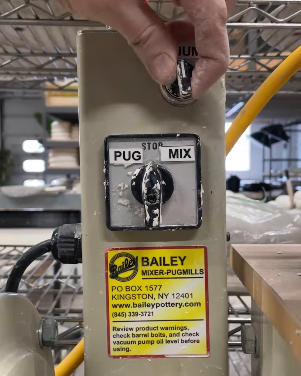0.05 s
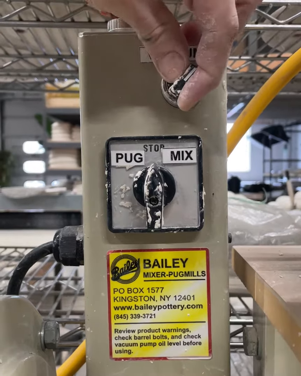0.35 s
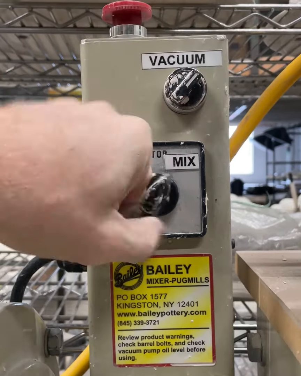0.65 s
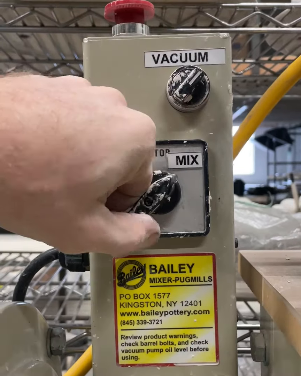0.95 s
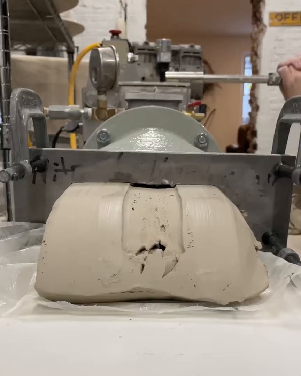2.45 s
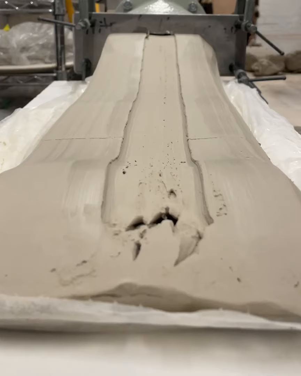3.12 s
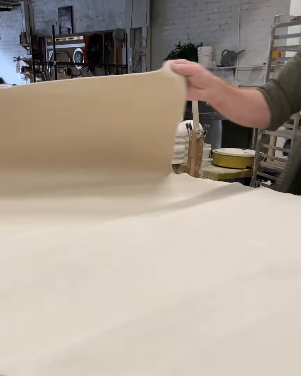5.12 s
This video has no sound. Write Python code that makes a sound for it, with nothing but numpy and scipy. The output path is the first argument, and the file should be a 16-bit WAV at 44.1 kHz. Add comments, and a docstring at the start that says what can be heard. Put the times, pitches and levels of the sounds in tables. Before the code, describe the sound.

A switch clicks and a clay mixer's motor and pump knock rapidly, then stop; wet clay crackles and is scraped and slid.

```python
"""A pugmill in a pottery studio, heard close up from one place after another.
First a switch starts the motor and vacuum pump, whose valve knocks the housing 29 times a second.
At 1.3 s a second switch bangs and a limiter ducks the level. At 3.8 s the pump stops, and wet clay
crackles out of the nozzle as air pockets burst. The clay is then scraped, stroked and slid, sounding
by stick-slip friction, and at last drops onto the table. The room rumbles throughout.
"""
import sys
import numpy as np
from scipy import signal
from scipy.fft import rfft, irfft
from scipy.io import wavfile
from scipy.ndimage import uniform_filter1d, minimum_filter1d

SR = 44100
rng = np.random.default_rng(int(sys.argv[2]) if len(sys.argv) > 2 else 0)


def transcribe(u):
    """Save the signal u as a 16-bit wav file named by the first command-line argument.

    u: samples, shape (n,) or (channels, n), limited to [-1, 1]; the rate is SR.
    q: integer samples, one column per channel.
    """
    v = np.clip(np.atleast_2d(u).T, -1, 1)
    q = np.round(v * 32767).astype(np.int16)
    wavfile.write(sys.argv[1], SR, q)


N = 299020
T = np.arange(N) / SR
PUMP_STOP_S = 3.82

# the housing's response to a knock at each listening place: (frequency [Hz], level [dB])
AT_PANEL = [(120, -4.5), (204, -9), (234, -16), (263, 2.5), (292, -10), (321, -1), (395, 9.5), (455, -7.5),
            (550, -2), (740, -8), (1080, -18.5), (1200, -11.5), (1340, -12.5), (1470, -26), (2000, -26),
            (3000, -34), (5000, -66)]
AT_SWITCH = [(120, -11.5), (204, -8.5), (292, -21.5), (321, -2.5), (350, -11), (380, 2.5), (438, 6),
             (467, -8), (496, 2.5), (560, -22.5), (670, -16), (900, -26.5), (1170, -22), (1650, -27.5),
             (2200, -38), (2900, -31.5), (4500, -70.5)]
AT_PUMP = [(145, -10.5), (204, -14.5), (263, 0.5), (292, -23), (321, 1.5), (350, -12), (435, 4.5),
           (475, -7), (600, -13.5), (800, -19), (920, -23.5), (1050, -23), (1230, -26.5), (1450, -38),
           (5000, -53.5)]
# level difference between the ears: (frequency [Hz], left minus right [dB])
PANEL_LEAN = [(130, 6.5), (380, 5), (650, 7.5), (1290, 2), (2400, -6), (4400, 11)]
PUMP_LEAN = [(350, 2), (700, -7.5), (1290, -8), (4400, -8.5)]
CENTRED = [(100, 0.0026)]
# the knock's quick slap off a nearby surface, at the panel and by the pump: (delay [s], gain [ratio])
PANEL_SLAP, PUMP_SLAP = (0.002447, 0.67), (0.002234, -0.62)
# the listening places in turn: (housing response, lean, right-ear lag frequency [Hz], slap)
PLACES = ([(AT_PANEL, PANEL_LEAN, 740, PANEL_SLAP)] * 2
          + [(AT_SWITCH, CENTRED, 4900, PUMP_SLAP), (AT_SWITCH, PUMP_LEAN, 5000, PUMP_SLAP)]
          + [(AT_PUMP, CENTRED, 9000, PUMP_SLAP)] * 2)
# the pump at each place: (start [s], first knock [s], shaft speed [turns/s])
PUMP_RUNS = [(.26, .305, 29.0), (.487, .5157, 29.04), (1.155, 1.183, 29.33), (1.82, 1.8396, 29.22),
             (2.485, 2.508, 29.29), (3.155, 3.178, 29.27)]
# its strength there: (knock [dB], 4th order [dB], 6th order [dB], mains [dB], hiss [dB], echo [dB])
PUMP_LEVELS = [(-17.5, -21, -27, -44, -33.5, -0.5), (-18, -22.5, -29, -35, -34, -2),
               (-24.5, -27, -26, -25.5, -40.5, 0.5), (-19, -30, -26, -49, -39, -2.5),
               (-30, -31.5, -33.5, -66, -51.5, 6.5), (-31.5, -31.5, -30.5, -50, -49.5, 6)]
# air from the pump: (frequency [Hz], level [dB])
AIR_TONE = [(1760, -3.5), (3000, -7), (7400, -7.5), (13000, -5), (16000, -11)]
# the motor's whine: (frequency [Hz], level [dB])
MOTOR_WHINE = [(2137, -61), (2880, -58.5)]
# its tones at start-up, by the nozzle and under load: (start [s], end [s], frequency [Hz], level [dB])
MOTOR_HUMS = [(0.14, 0.27, 110.5, -24), (3.157, 3.818, 797, -44), (3.16, 3.825, 1024, -51),
              (5.646, 6.156, 118.3, -36.5)]

# switch clicks, and a faint tick where the listening place changes: (time [s], peak [dB], t60 [s])
CLICKS = [(0.1443, -9, 0.034), (0.487, -12.5, 0.0077), (0.664, -6, 0.034), (0.713, -17.5, 0.15),
          (1.328, -8.5, 0.017), (1.335, 5.5, 0.081), (3.1548, -24.5, 0.0061), (5.808, -13, 0.047)]
# bursts of air pockets in the clay: (time [s])
POP_TIMES = [3.823, 3.8337, 3.8525, 3.8615, 3.8763, 3.9029, 3.954, 3.991, 4.036, 4.048, 4.0687, 4.1176,
             4.199, 4.2286, 4.247, 4.266, 4.279]
# sticky clay letting go: (time [s], peak [dB])
CLAY_SNAPS = [(4.501, -11.5), (4.521, -16), (4.618, -21), (4.669, -23), (4.731, -21), (4.77, -21.5),
              (4.791, -21), (4.889, -14.5)]
# pushes on the clay, by kind: (start [s], peak time [s], peak level [dB])
SQUEEZES = [(3.82, 3.83, -45.5), (4.255, 4.3, -32.5)]
SCRAPES = [(4.488, 4.485, -30.5), (4.604, 4.806, -37), (4.867, 5.137, -28)]
STROKES = [(5.513, 5.613, -44.5), (5.652, 5.752, -46.5), (5.79, 6.088, -43)]
SLIDES = [(5.157, 5.25, -54), (6.152, 6.168, -41)]
# spectra of a click, a pop, each kind of push and the slab's bumping: (frequency [Hz], level [dB])
CLICK_TONE = [(350, -52.5), (600, 3), (1700, 2), (8160, -3), (13400, -7), (16000, -26)]
POP_TONE = [(410, -53), (900, -9), (4000, -10), (6000, -9), (12600, -10.5), (16000, -31)]
SQUEEZE_TONE = [(500, -37), (1200, -12), (7830, -6.5), (13000, -12.5), (16000, -22)]
SCRAPE_TONE = [(240, -33), (400, -5), (2470, 1), (12900, -5), (16000, -16)]
STROKE_TONE = [(400, -24), (2500, -9.5), (13000, -13.5)]
SLIDE_TONE = [(240, -14), (400, -3.5), (1700, -3), (5030, -19), (13000, -17)]
BUMP_TONE = [(25, -15), (60, 7.5), (150, -18.5), (260, -4.5), (600, -62)]
# resonances of an air pocket and of the nozzle: (frequency [Hz], bandwidth [Hz], gain [ratio])
POCKET_RINGS = [(1460, 120, 1.1), (5480, 180, 2.6)]
NOZZLE_RINGS = [(1320, 190, 2.4), (2080, 77, 7.7), (3960, 240, 2), (5540, 260, 0.67)]
# modes of knob, panel, control box, table and smacking clay: (frequency [Hz], bandwidth [Hz], level [dB])
KNOB_MODES = [(1950, 73, 2), (3870, 26, -7)]
PANEL_MODES = [(1330, 110, 0)]
BOX_MODES = [(315, 81, 0.076), (580, 150, -1.1)]
TABLE_MODES = [(616, 100, 0), (334, 100, -4)]
SMACK_MODES = [(1160, 320, 0)]
# short rubs that excite them; the control box's second row is the pump's weak first knock: (time [s], half-
# width [s], level [dB])
KNOB_RUBS = [(0.737, 0.024, -35.5)]
PANEL_RUBS = [(0.19, 0.11, -45)]
BOX_RUBS = [(.16, 0.011, -31), (.236, 0.012, -30)]
TABLE_RUBS = [(5.605, 0.024, -39.5), (5.655, 0.0039, -38.5)]

# the studio's rumble: (frequency [Hz], level [dB])
ROOM_TONE = [(25, -39.5), (55, -8), (110, 2), (240, -8.5), (700, -22.5), (1700, -34), (5400, -40.5),
             (16000, -76)]
# its strength by the panel, the pump, the nozzle and the table: (start [s], level [dB])
ROOM_LEVELS = [(0, -36), (2.485, -35), (3.82, -37), (5.157, -39)]
# stereo width of noise: (frequency [Hz], side minus mid [dB])
STEREO_WIDTH = [(60, -40.5), (400, -4), (2500, -4.5), (6000, -1.5), (14000, 4)]
# treble colour, the centre hollow near 10 kHz and the sides dull above 12 kHz: (frequency [Hz], gain [dB])
MID_TONE = [(4400, 0.5), (4900, -5), (5300, 2.5), (8200, -1), (9400, -20), (11100, -23), (11900, -0.5)]
SIDE_TONE = [(11500, -1.5), (14500, -8)]


def pump(run, end, levels, place, tick_db=-3, tick_turn=0.54, tick_hz=2000, puff=2.8):
    """Periodic impact: each turn the exhaust valve knocks, air puffs out and the inlet valve ticks."""
    start, first, rate = run
    knock_db, fourth_db, sixth_db, mains_db, hiss_db, echo_db = levels
    housing, lean, lag_hz, (slap_s, slap_gain) = place
    run_up = .25 * np.exp(-(T - PUMP_RUNS[0][0]) / .018)  # the first turn is slow
    turns = (T - first) * rate + run_up + .0035 * drift(size=4000)
    # the slap off a nearby surface has no bass, and the light inlet valve only treble
    slap = slap_gain * high_pass(strikes(turns - slap_s * rate), 670)
    tick = amp(tick_db) * high_pass(strikes(turns - tick_turn), tick_hz)
    blow = colour(high_pass(strikes(turns), 74) + slap + tick, housing)
    blow = disperse(blow, hz=420, q=1.5)
    ears = np.array([blow, disperse(blow, lag_hz, q=1)])
    ears += amp(echo_db) * echo(blow, t60=.08, low_hz=760)
    knock = np.array([colour(ear, [(hz, sign * db / 2) for hz, db in lean])
                      for ear, sign in zip(ears, (1, -1))])
    # the shaft's fourth order beats slowly against the mains hum
    hum = amp(fourth_db) * np.cos(2 * np.pi * 4 * turns + np.pi / 2)
    hum -= amp(sixth_db) * np.cos(2 * np.pi * 6 * turns)
    hum += amp(mains_db) * np.cos(2 * np.pi * 120 * T)
    # echo smooths the puffs into a steady hiss and blurs the knock into a churn
    airflow = 1 + puff / (1 + amp(2 * echo_db)) * np.exp(-((turns % 1 - .16) / 0.078) ** 2)
    air = amp(hiss_db) * unit_rms(noise(airflow, AIR_TONE))
    churn = amp(knock_db + echo_db - 13) * unit_rms(high_pass(noise(airflow, housing), 560, order=6))
    return between(start, end) * (amp(knock_db) * unit_rms(knock) + np.sqrt(2) * hum + air + churn)


def motor():
    """Phase modulation makes the motor's hum and whine waver; air hisses as the pump runs up."""
    hum = sum(between(start, end) * amp(db) * unit_rms(np.sin(2 * np.pi * hz * T + 0.43 * drift(2500)))
              for start, end, hz, db in MOTOR_HUMS)
    whine = sum(amp(db) * unit_rms(np.sin(2 * np.pi * hz * T + 2 * drift(200))) for hz, db in MOTOR_WHINE)
    air = between(0.14, .26) * amp(-42) * unit_rms(noise(np.ones(N), AIR_TONE))
    return hum + between(PUMP_RUNS[0][0], PUMP_STOP_S) * whine + air


def switches(thump_s=1.339, thump_db=22, thump_hz=55, thump_t60=0.069, jolt_cycles=1.3, jolt_s=0.0035):
    """Impact excitation: switches click, and a contactor thumps the control box, sharply and then deep."""
    clicks = sum(burst(s, db, t60, CLICK_TONE) for s, db, t60 in CLICKS)
    t = np.maximum(T - thump_s, 0)
    onset = 1 - np.exp(-t / jolt_s)
    cycles = thump_hz * t + jolt_cycles * onset
    thump = amp(thump_db - 60 * t / thump_t60) * onset * np.sin(2 * np.pi * cycles)
    box = sum(judder(*row, BOX_MODES) for row in BOX_RUBS)
    panel = sum(judder(*row, PANEL_MODES) for row in PANEL_RUBS)
    reflections = amp(-14.5) * echo(clicks[0], t60=0.53, low_hz=300)
    knob = sum(judder(*row, KNOB_MODES) for row in KNOB_RUBS)
    return clicks + thump + box + panel + reflections + knob


def air_pockets(first_db=-17.5, fade_db_per_s=6):
    """Cavity resonance: bursting pockets ring, the larger ones lower, and weaken as the air runs out."""
    sizes = 1 + .022 * rng.standard_normal(len(POP_TIMES))
    pops = [burst(s, first_db - fade_db_per_s * (s - POP_TIMES[0]), 0.018, POP_TONE, rise_s=0.0039)
            for s in POP_TIMES]
    return sum(resonate(pop, [(hz / size, width, gain) for hz, width, gain in POCKET_RINGS])
               for pop, size in zip(pops, sizes))


def sputter(slips_per_s=80, jitter=.22, uneven_db=2.5, smooth=0.22):
    """Stick-slip flow: clay under pressure moves in quick, uneven puffs that ring the nozzle."""
    slips = np.cumsum(slips_per_s * np.exp(jitter * drift(size=500))) / SR
    sizes = amp(uneven_db * rng.standard_normal(N))[slips.astype(int)]
    puffs = sizes * np.sin(np.pi * slips) ** 6
    return unit_rms(resonate(noise(puffs + smooth, SQUEEZE_TONE), NOZZLE_RINGS))


def rub(tone, grains_per_s, grain_s, smooth):
    """Friction noise: clay sticks and tears in tiny grains of uneven size over a smooth hiss."""
    sizes = amp(3.2 * np.minimum(rng.exponential(1, N), 4))
    tears = rng.random(N) < grains_per_s / SR
    grains = unit_rms(signal.lfilter([1], [1, -np.exp(-1 / (grain_s * SR))], sizes * tears))
    return unit_rms(noise(grains + smooth, tone))


def flop(s, hz, db, t60):
    """Damped free vibration: the slab drops and the table rings low."""
    t = np.maximum(T - s, 0)
    return amp(db - 60 * t / t60) * np.sin(2 * np.pi * hz * t)


def clay():
    """Friction and adhesion: clay is squeezed out, snaps free, and is scraped, stroked and slid."""
    direct = air_pockets()
    direct += sum(burst(s, db, t60=0.017, tone=SCRAPE_TONE) for s, db in CLAY_SNAPS)
    direct += judder(s=4.9005, half_width_s=0.002, db=-25.5, modes=SMACK_MODES)  # wet clay pulls free
    squeeze = force(SQUEEZES, SCRAPES[0][0], swell_db=0, ease_db_per_s=8)
    scrape = force(SCRAPES, SLIDES[0][0], swell_db=8.5, ease_db_per_s=42)
    stroke = force(STROKES, SLIDES[1][0], swell_db=12, ease_db_per_s=10)
    slide = force(SLIDES, N / SR, swell_db=4, ease_db_per_s=10.5)
    direct += squeeze * sputter()
    direct += scrape * rub(SCRAPE_TONE, grains_per_s=800, grain_s=0.00082, smooth=1.36)
    direct += stroke * rub(STROKE_TONE, grains_per_s=400, grain_s=0.00067, smooth=4.0)
    direct += slide * rub(SLIDE_TONE, grains_per_s=830, grain_s=0.00055, smooth=3.4)
    bumps = slide * amp(4.5) * unit_rms(noise(np.ones(N), BUMP_TONE))  # the heavy slab bumps as it slides
    reflections = amp(-21) * echo(direct[0], t60=0.075, low_hz=400)
    table = sum(judder(*row, TABLE_MODES) for row in TABLE_RUBS)
    return direct + reflections + bumps + table + flop(s=6.588, hz=52, db=-28, t60=0.4)


def judder(s, half_width_s, db, modes):
    """Modal excitation: a short rub makes a few damped modes ring."""
    t = T[:SR // 10]
    ring = sum(amp(level) * np.exp(-np.pi * width * t) * np.sin(2 * np.pi * hz * t)
               for hz, width, level in modes)
    friction = np.exp(-((T - s) / half_width_s) ** 2) * rng.standard_normal((2, N))
    friction = friction + friction[::-1] / 2  # the ears share part of it
    return amp(db) * signal.oaconvolve(friction, ring[None] / np.linalg.norm(ring), axes=1)[:, :N]


def burst(s, peak_db, t60, tone, rise_s=0.00089):
    """Exponential decay: a crack of coloured noise swells quickly and dies away."""
    t = T[:SR // 6]
    crack = noise((1 - np.exp(-t / rise_s)) * amp(-60 * t / t60), tone)
    crack *= amp(peak_db) / abs(crack).max()
    return np.pad(crack, ((0, 0), (round(s * SR), N)))[:, :N]


def echo(x, t60, low_hz):
    """Diffuse reflection from the machine and the walls, different at each ear."""
    t = T[:SR // 3]
    tail = rng.standard_normal((2, len(t))) * amp(-60 * t / t60)
    for _ in range(2):  # a flattened spectrum lets no single pitch stand out
        flat = irfft(np.exp(1j * np.angle(rfft(tail))), len(t))
        tail = flat * np.exp(-t / t60) * (t > .002)
    tail = high_pass(tail, low_hz, order=4)
    return signal.oaconvolve(x[None], tail / np.linalg.norm(tail[0]), axes=1)[:, :N]


def room():
    """Ambient noise: the low, uneven rumble of the studio."""
    starts, db = np.transpose(ROOM_LEVELS)
    level_db = uniform_filter1d(db[np.searchsorted(starts[1:], T)], size=2000)
    return amp(level_db + 0.5 * drift(size=3000)) * unit_rms(noise(np.ones(N), ROOM_TONE))


def strikes(turns):
    """Impulse train: one click each time turns passes a whole number, placed between samples."""
    at = np.flatnonzero(np.diff(np.floor(turns)) > 0)
    late = (np.ceil(turns[at]) - turns[at]) / (turns[at + 1] - turns[at])
    size = 1 + 0.012 * rng.standard_normal(len(at))
    out = np.zeros(N)
    out[at], out[at + 1] = size * (1 - late), size * late
    return out


def force(pushes, end, swell_db, ease_db_per_s):
    """Amplitude envelope: each push builds to its peak, then eases off until the next one."""
    out = np.zeros(N)
    stops = [row[0] for row in pushes[1:]] + [end]
    for (start, peak, db), stop in zip(pushes, stops):
        to_go = np.clip((peak - T) / max(peak - start, 1e-3), 0, 1)
        level_db = db - swell_db * to_go - ease_db_per_s * np.maximum(T - peak, 0)
        out += between(start, stop) * amp(level_db)
    return out


def resonate(x, modes):
    """Resonance: adds the ring of a few narrow bands."""
    return x + sum(gain * signal.lfilter(*signal.iirpeak(hz, hz / width, fs=SR), x)
                   for hz, width, gain in modes)


def disperse(x, hz, q):
    """Dispersion: sheet metal holds back the waves near hz, so a knock builds up over a few cycles."""
    return x - 2 * signal.lfilter(*signal.iirpeak(hz, q, fs=SR), x)


def noise(envelope, tone):
    """Partial coherence: coloured noise for two ears, bass in the middle and treble wide."""
    mid, side = (colour(envelope * rng.standard_normal(len(envelope)), tone) for _ in range(2))
    side = colour(side, STEREO_WIDTH)
    return np.array([mid + side, mid - side])


def colour(x, tone, size=4096):
    """Minimum-phase filtering: the given spectrum rings after a blow, never before."""
    level_db = spectrum_db(tone, abs(np.fft.fftfreq(size, 1 / SR)))
    log_gain = np.log(amp(np.maximum(level_db, -100)))
    taps = np.fft.ifft(np.exp(np.conj(signal.hilbert(log_gain)))).real
    return signal.oaconvolve(x, taps)[:len(x)]


def high_pass(x, hz, order=2):
    """High-pass filtering: attenuates the bass below hz."""
    return signal.sosfilt(signal.butter(order, hz, "high", fs=SR, output="sos"), x)


def spectrum_db(tone, hz):
    """Interpolation of a spectrum table on a log-frequency axis."""
    table_hz, db = np.transpose(tone)
    return np.interp(np.log(hz + 1), np.log(table_hz + 1), db)


def between(start, end):
    """Time window: 1 from start to end, with short ramps."""
    return uniform_filter1d(((T >= start) & (T < end)) * 1., size=90)


def drift(size):
    """Random fluctuation, correlated over about size samples."""
    return unit_rms(uniform_filter1d(uniform_filter1d(rng.standard_normal(N), size), size))


def unit_rms(x):
    """Normalisation to an rms of 1."""
    return x / np.sqrt(np.mean(x ** 2) + 1e-20)


def amp(db):
    """Amplitude ratio of a level in decibels."""
    return 10 ** (np.asarray(db) / 20)


def scene():
    """Superposition of the machine, its switches, the clay and the room."""
    ends = [run[0] for run in PUMP_RUNS[1:]] + [PUMP_STOP_S]
    pumping = sum(pump(*row) for row in zip(PUMP_RUNS, ends, PUMP_LEVELS, PLACES))
    return pumping + motor() + switches() + clay() + room()


def record(dry, ceiling_db=-2.0, hold_s=0.09, recovery_db_per_s=95, edge_hz=16200):
    """Mid-side filtering colours the treble of centre and sides; then peaks and bandwidth are limited."""
    hz = np.fft.rfftfreq(N, 1 / SR)
    mid = irfft(rfft((dry[0] + dry[1]) / 2) * amp(spectrum_db(MID_TONE, hz)), N)
    side = irfft(rfft((dry[0] - dry[1]) / 2) * amp(spectrum_db(SIDE_TONE, hz)), N)
    stereo = np.array([mid + side, mid - side])
    # the limiter drops the gain at once, holds it and lets it back
    over_db = np.maximum(20 * np.log10(abs(stereo).max(0) + 1e-9) - ceiling_db, 0)
    recovery_db = T * recovery_db_per_s
    cut_db = np.maximum.accumulate(over_db + recovery_db) - recovery_db
    hold = int(hold_s * SR) // 2 * 2 + 1
    held_db = -minimum_filter1d(-cut_db, hold, origin=hold // 2)
    ducked = stereo * amp(-uniform_filter1d(held_db, size=16))
    low_pass = signal.firwin(511, edge_hz, window=("kaiser", 9), fs=SR)
    return signal.oaconvolve(ducked, low_pass[None], "same")


dry = scene()
out = record(dry)
transcribe(out)
```